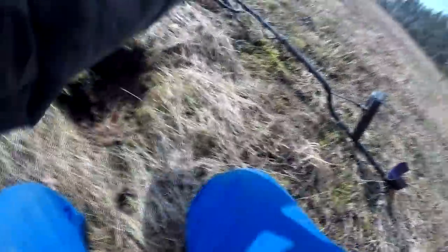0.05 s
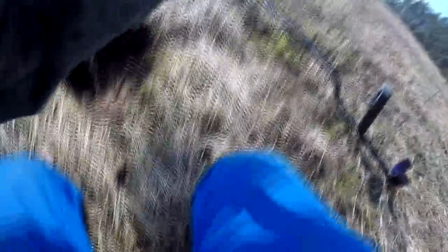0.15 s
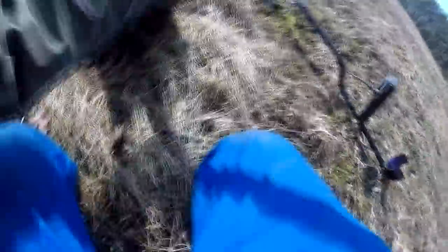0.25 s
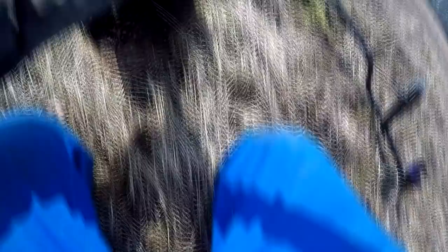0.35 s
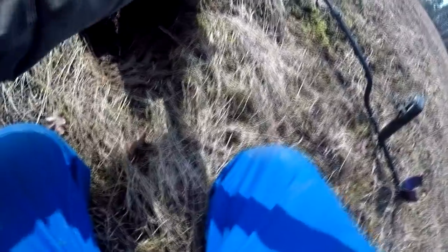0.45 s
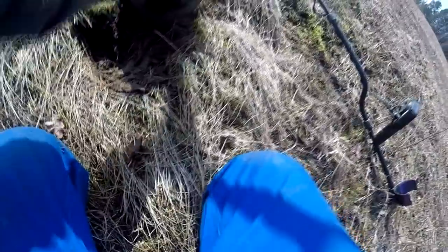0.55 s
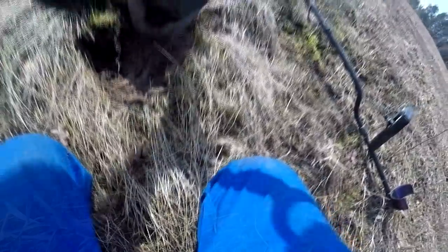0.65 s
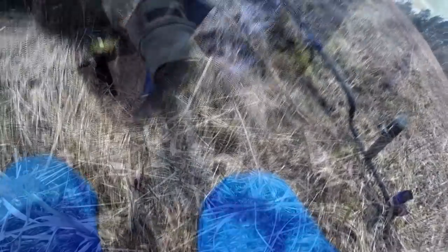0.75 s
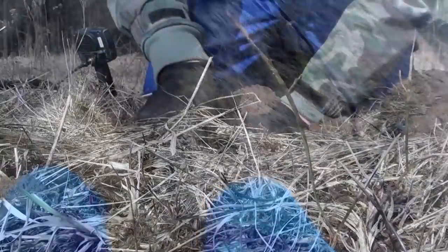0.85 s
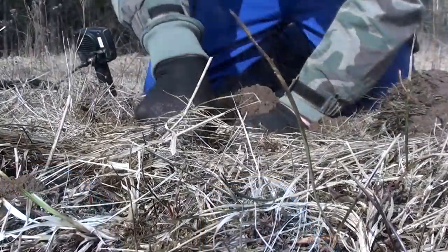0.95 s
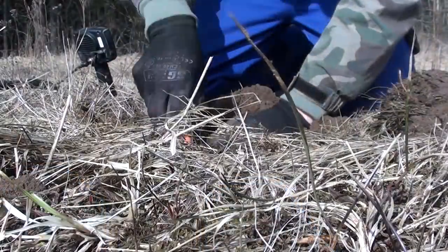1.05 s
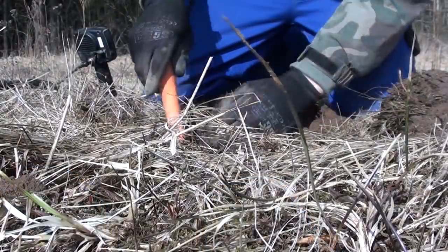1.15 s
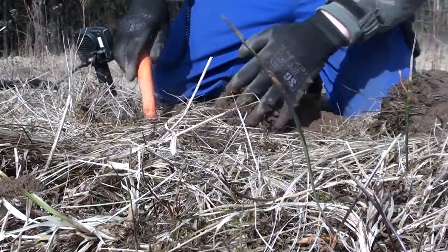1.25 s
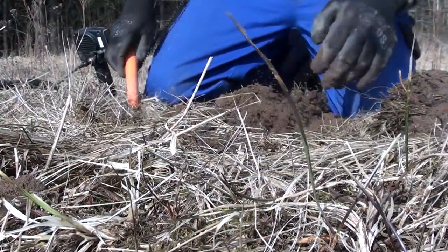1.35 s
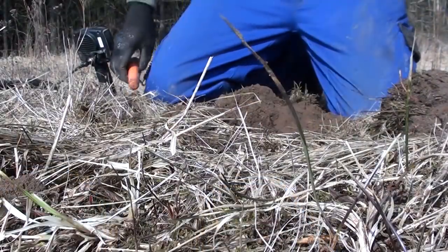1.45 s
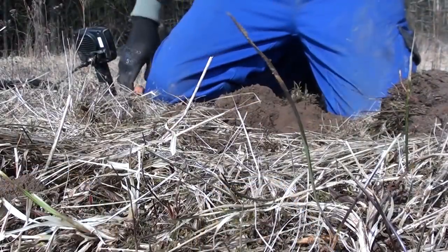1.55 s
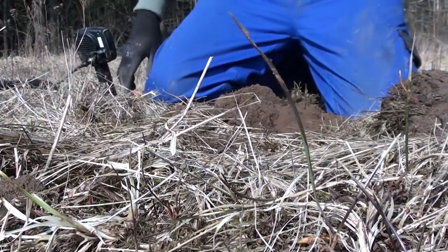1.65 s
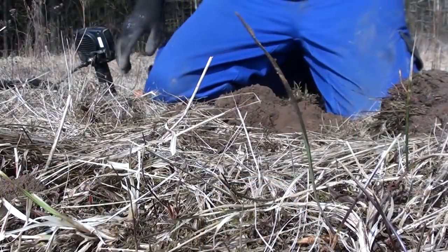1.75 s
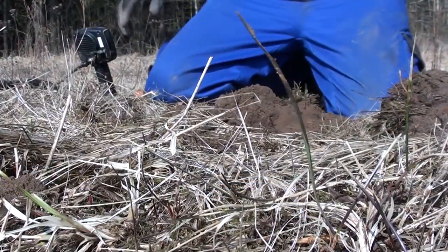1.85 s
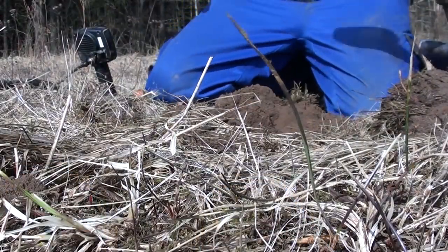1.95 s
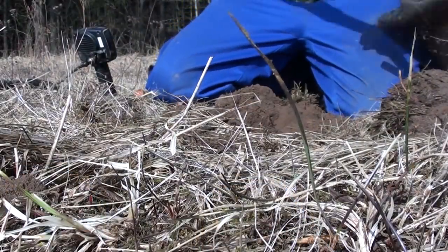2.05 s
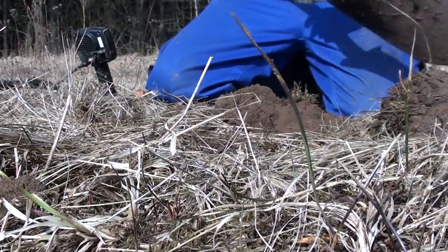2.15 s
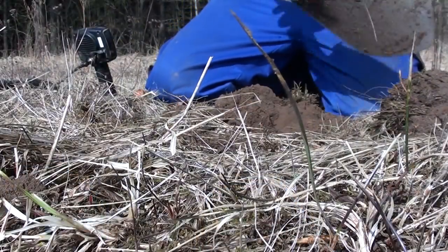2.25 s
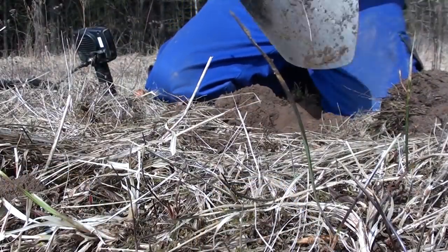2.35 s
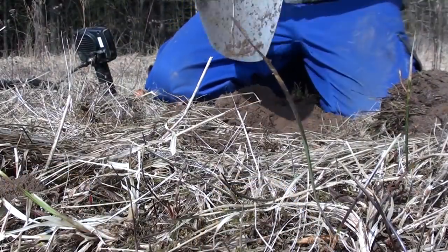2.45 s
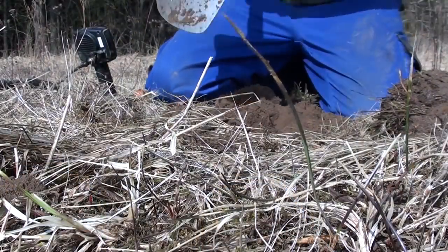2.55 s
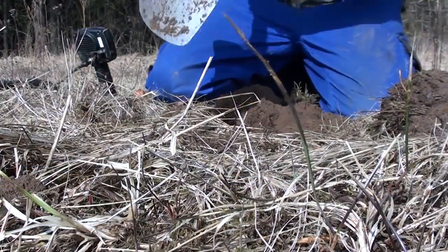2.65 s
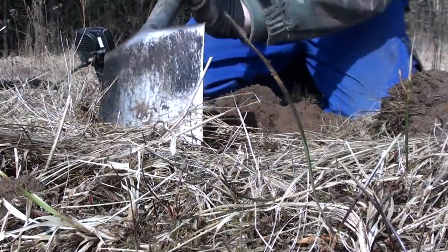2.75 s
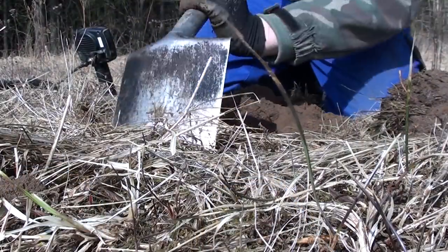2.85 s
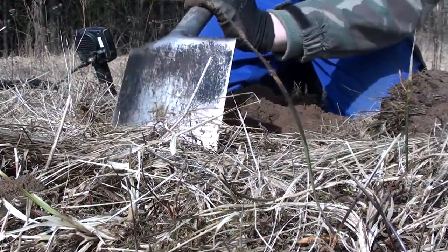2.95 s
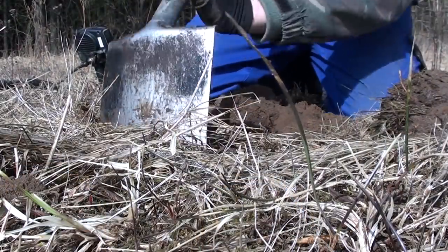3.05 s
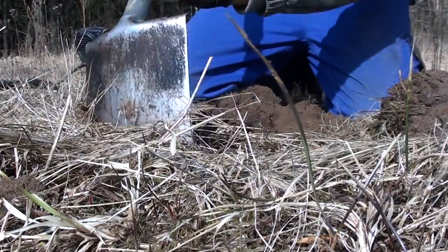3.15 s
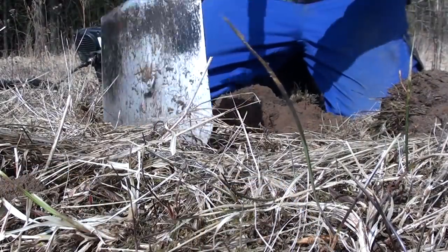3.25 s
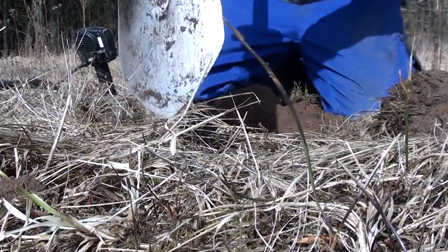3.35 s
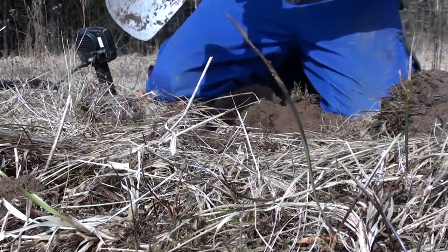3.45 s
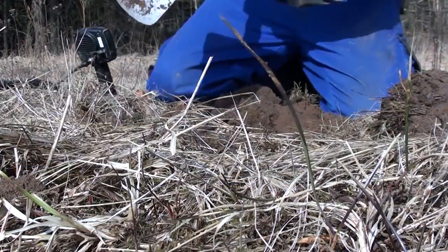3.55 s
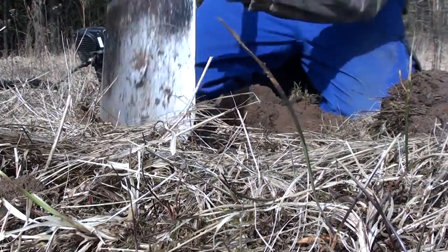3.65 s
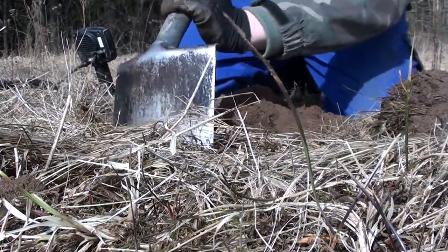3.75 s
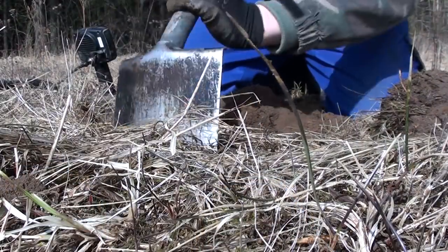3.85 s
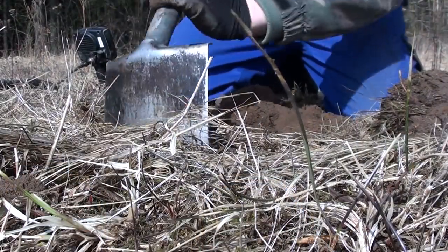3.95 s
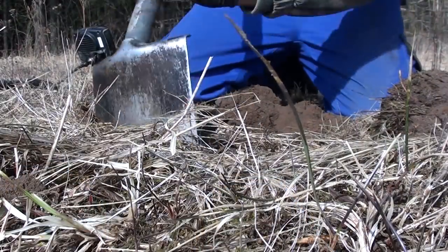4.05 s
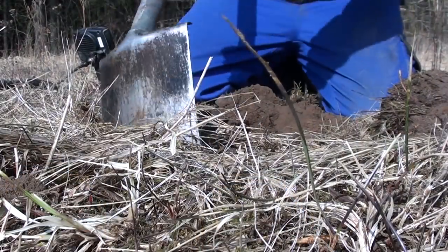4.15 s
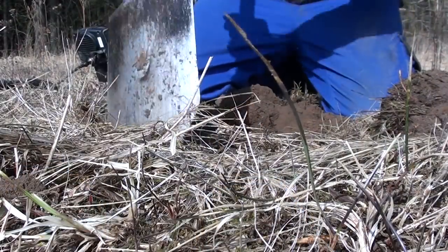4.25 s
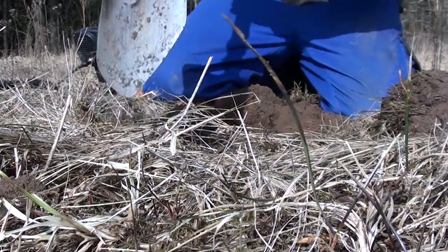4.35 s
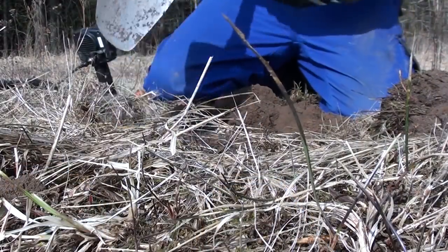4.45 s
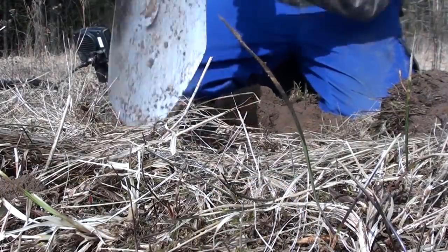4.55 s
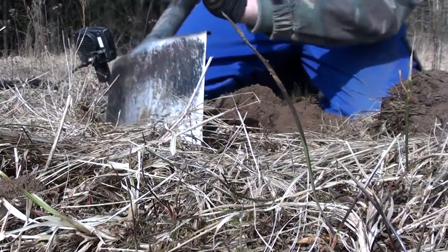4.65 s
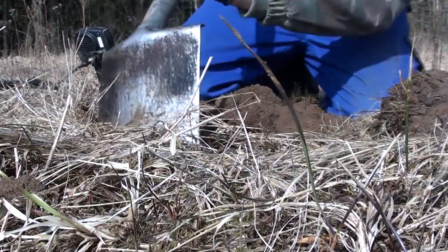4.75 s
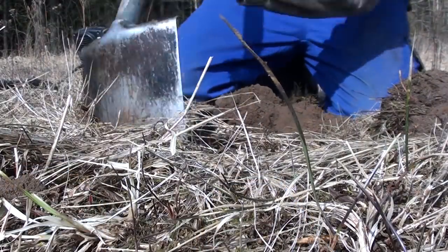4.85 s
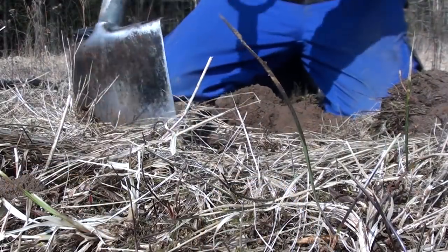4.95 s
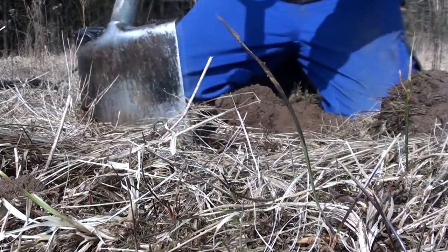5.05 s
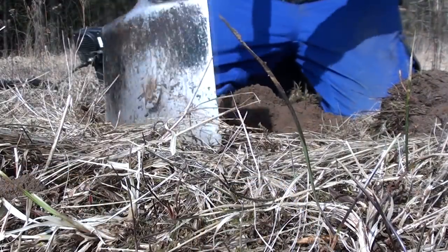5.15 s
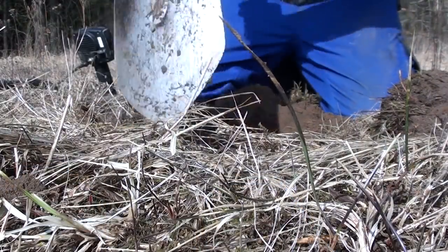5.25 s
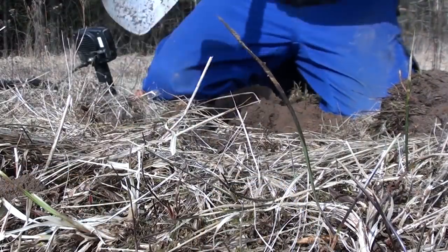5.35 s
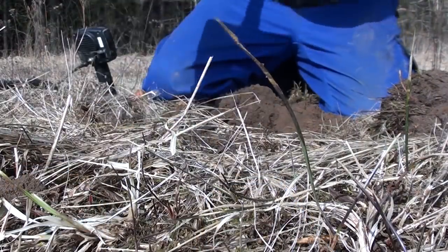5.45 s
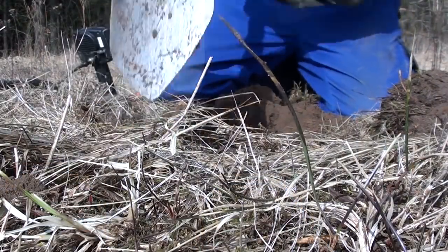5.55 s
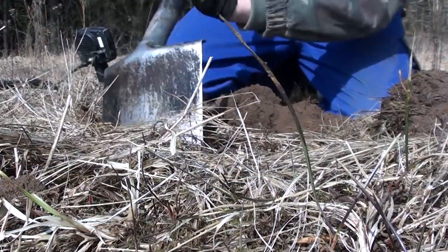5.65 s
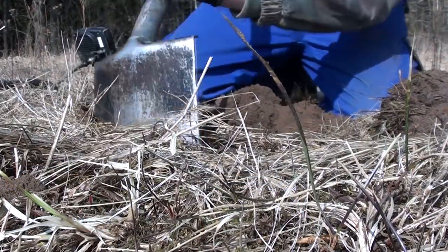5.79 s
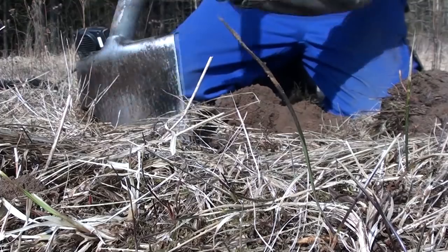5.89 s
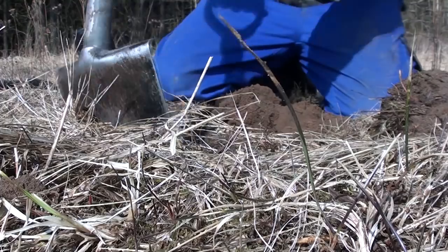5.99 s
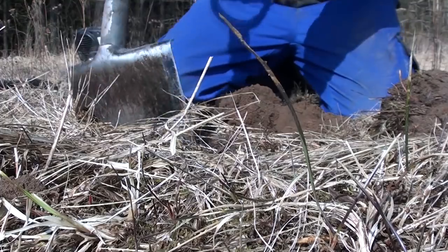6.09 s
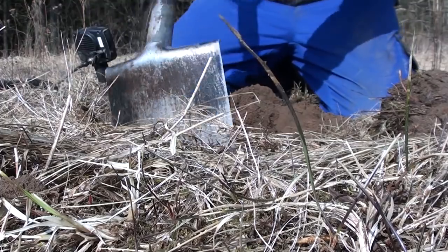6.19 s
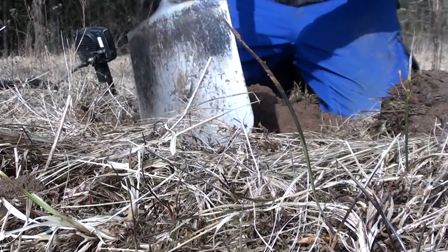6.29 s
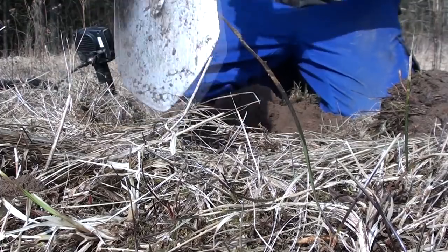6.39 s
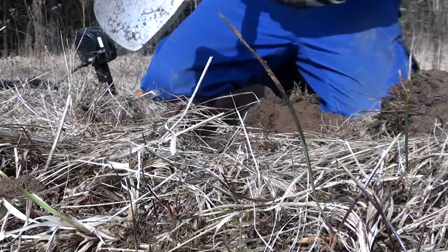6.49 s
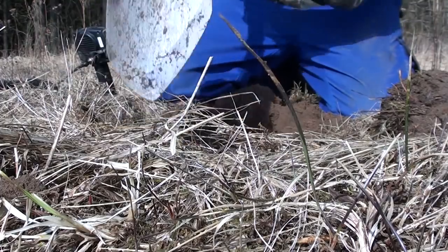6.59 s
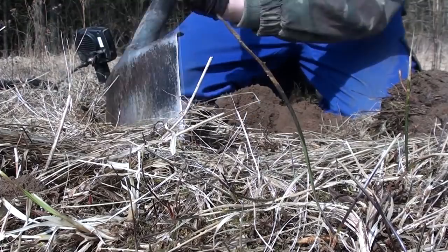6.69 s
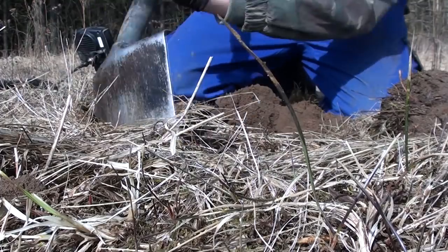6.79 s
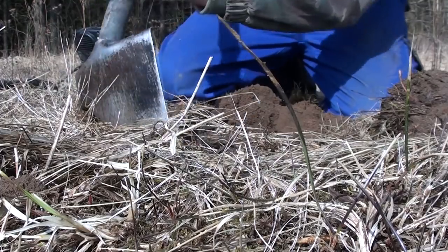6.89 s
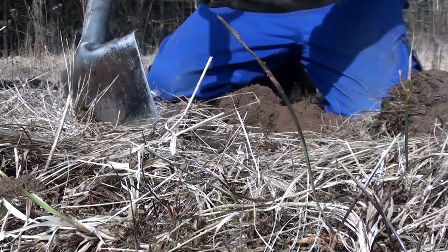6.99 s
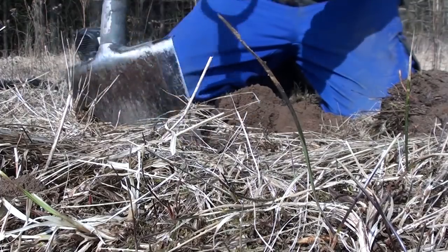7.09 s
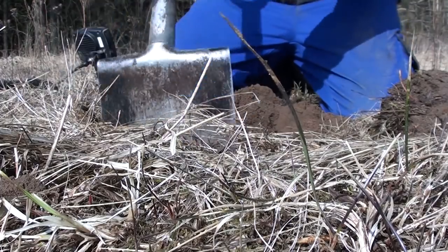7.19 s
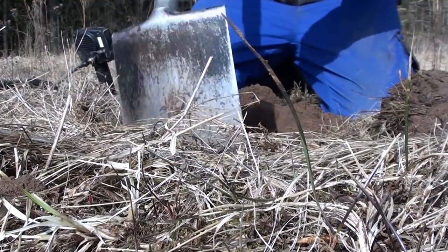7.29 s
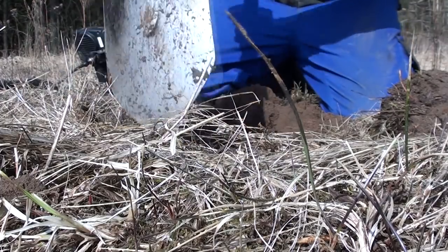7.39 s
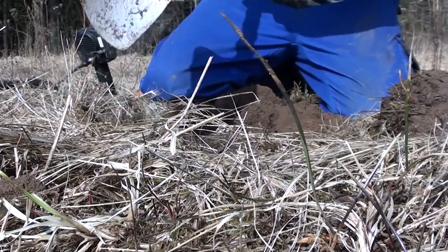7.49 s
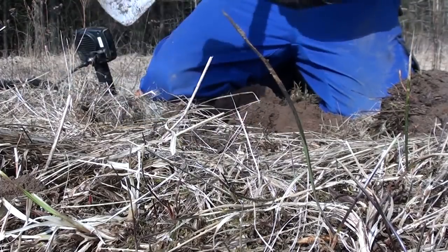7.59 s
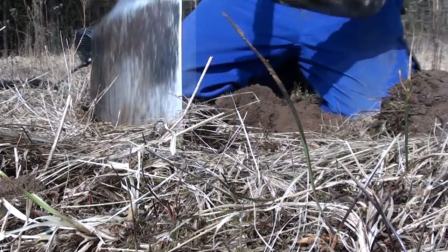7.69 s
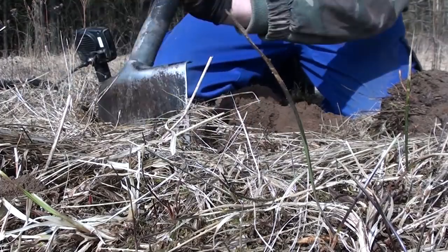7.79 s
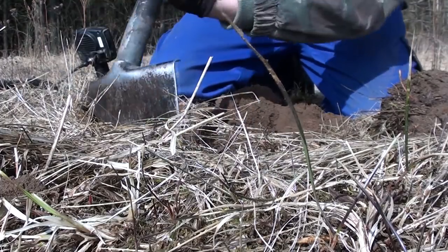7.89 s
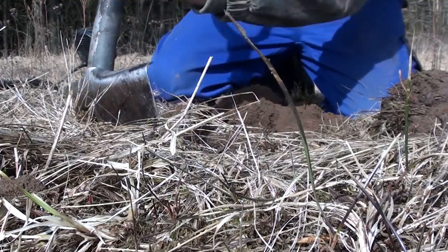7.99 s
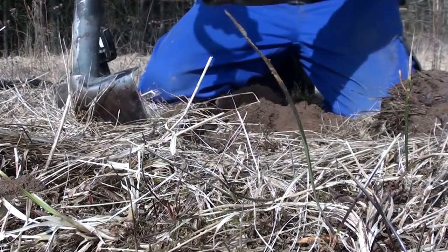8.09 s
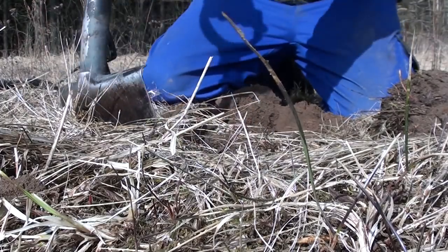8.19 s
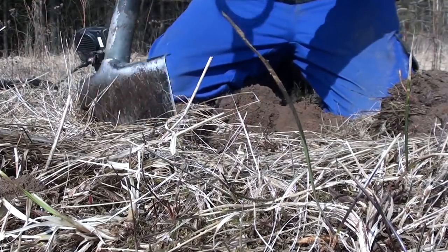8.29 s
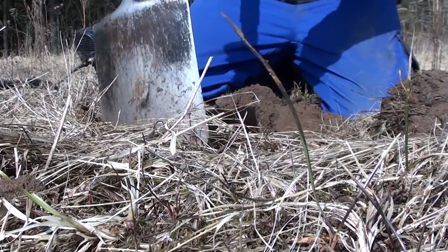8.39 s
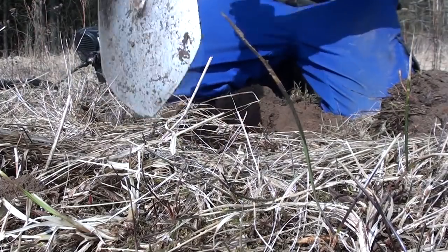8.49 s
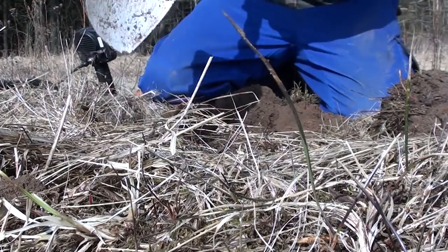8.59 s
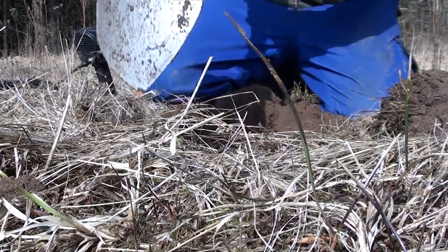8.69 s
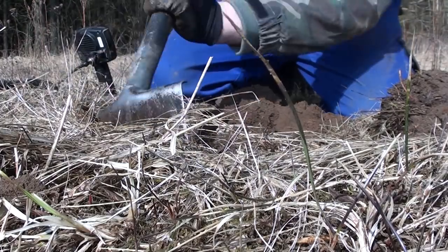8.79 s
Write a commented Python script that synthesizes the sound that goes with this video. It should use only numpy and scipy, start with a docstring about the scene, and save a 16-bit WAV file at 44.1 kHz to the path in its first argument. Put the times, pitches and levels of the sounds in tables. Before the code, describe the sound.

Brief handling rumble and bumps, then a steel spade chops six times into hard stony ground close by, grit crunching, blade clanking and scraping.

```python
"""A steel spade chops six times into hard stony ground, close by: grit bursts, the blade clanks, bends and thuds.
Between chops noise grains grate through soil and dry grass; decaying sines ring as the blade is pulled free.
For the first second a body-worn microphone adds rumble, rustle and bumps, then one lying in the grass takes over.
Open air: no room, a soft far rush, nearly mono up close; the highest peaks are clipped."""
import sys
import numpy as np
from scipy import signal
from scipy.fft import rfft, irfft, next_fast_len
from scipy.io import wavfile
from scipy.ndimage import uniform_filter1d, map_coordinates

SR = 44100
rng = np.random.default_rng(int(sys.argv[2]) if len(sys.argv) > 2 else 0)


def unload_audio(sound):
    """Save the sound as a 16-bit wav file, at the path given as the first command line argument."""
    columns = np.transpose(np.atleast_2d(sound))
    # keep every value between -1 and 1, then stretch to whole-number steps
    steps = np.round(np.clip(columns, -1, 1) * 32767)
    wavfile.write(sys.argv[1], SR, steps.astype(np.int16))


N = 389403

# The chops. Each row: impact in seconds, strength in dB, push in seconds, bending tone in Hz,
# its level in dB, its t60 in seconds, clank in dB, the pitch the clank favours in Hz.
CHOPS = [(2.8459, -1.5, 0.0067, 419, 2.5, 0.089, 3.5, 610), (3.7614, -1, 0.022, 714, 3, 0.086, 2.5, 1010),
         (4.6844, -1, 0.015, 432, -7, 0.15, -4, 696), (5.6913, 1.5, 0.0077, 484, 2.5, 0.18, 0.5, 1020),
         (6.7378, 0, 0.044, 428, -0.5, 0.084, -21, 1010), (7.7941, 2.5, 0.0068, 417, -3, 0.12, 5, 1450)]
# Resonances of the blade damped by soil. Each row: centre in Hz, width in Hz, level in dB.
BURIED_MODES = [(326.4, 66, -1.5), (470, 115, -1.5), (732, 161, -1.5), (1019, 82, -2.5), (1241, 64, -10),
                (1440, 170, -10.5), (2336, 390, -12), (4020, 36, -33), (5197, 53, -9.5), (7300, 70, -14)]
# Modes of the blade in air. Each row: pitch in Hz, level in dB, undamped t60 in seconds.
FREE_MODES = [(635, -14, .24), (786, -20, .5), (949, 0, .38), (1222, -9, .12), (1367, -10, .45),
              (1556, -22, .3), (1850, -20, .4), (2126, -14, .16), (2275, -11, .28), (2516, -12, .3),
              (2783, -13, .15), (3079, -16, .2), (3620, -14, .15), (4107, -14, .12), (4900, -18, .1),
              (5220, -12, .12), (7447, -14, .12), (8600, -18, .1), (9180, -18, .1), (10100, -18, .1)]
# Spectra of crushed grit and of dry grass. Each row: frequency in Hz, relative level in dB.
GRIT_SPECTRUM = [(710, -49), (1200, 3), (1400, -22), (1700, -7), (2620, -1), (4800, -6.5), (7410, 2),
                 (9510, -2), (16000, -15)]
GRASS_SPECTRUM = [(2470, -44), (4200, -8.5), (5910, -2.5), (6950, 2.5), (9140, -3.5), (10100, -3),
                  (15100, -19), (16000, 0.5)]


def amp(db):
    """dB to gain."""
    return 10 ** (np.asarray(db) / 20)


def unit(x):
    """x at rms 1."""
    return x / np.sqrt(np.mean(x ** 2) + 1e-20)


def along(points, hz):
    """Values at hz, joined between (Hz, value) points on a log frequency axis."""
    f, v = np.transpose(points)
    return np.interp(np.log(hz + 1), np.log(f + 1), v)


def curves(rows):
    """Gain per sample of a (seconds, dB) curve; -120 dB outside it."""
    s, db = np.transpose(rows)
    return amp(np.interp(np.arange(N) / SR, s, db, -120, -120))


def wobble(rate):
    """A random curve of straight segments, rate knots a second."""
    knots = rng.standard_normal(int(N * rate / SR) + 4)
    return map_coordinates(knots, [np.arange(N) * rate / SR], order=1)


def filtered(x, response):
    """x shaped by a (possibly complex) response of frequency."""
    m = next_fast_len(N + SR // 2)
    return irfft(rfft(x, m) * response(np.fft.rfftfreq(m, 1 / SR)), m)[..., :N]


def patchy(x, depth_db):
    """Noise whose level varies in small random patches of time and pitch, like crumbs of different sizes."""
    z = signal.stft(x, nperseg=256)[2]
    field = uniform_filter1d(rng.standard_normal(z.shape), size=3, axis=0)
    field = uniform_filter1d(field, size=4, axis=1)
    return unit(signal.istft(z * amp(depth_db * unit(field)), nperseg=256)[1][:N])


def grainy(spectrum, grain_db, lump_db, body=lambda hz: 1, shared_db=0):
    """Noise of rms 1 made of millisecond grains that come in lumps."""
    noise = patchy(rng.standard_normal(N), 3.16)
    grains = noise * amp(grain_db * wobble(700) + lump_db * wobble(45) + shared_db)
    return unit(filtered(grains, lambda hz: amp(along(spectrum, hz)) * body(hz)))


def bursts(rows):
    """Envelope of sudden pushes that hold, then decay: rows of (s, dB, hold s, t60 s)."""
    env, t = np.zeros(N + SR), np.arange(SR // 4) / SR
    for s, db, hold, t60 in rows:
        env[round(s * SR):][:len(t)] += amp(db - 60 * np.maximum(t - hold, 0) / max(t60, .003))
    return env[:N]


def ringing(rows, modes, spread_db, rise):
    """Each blow (s, dB, favoured Hz, fall dB per octave, share of t60) rings the modes at new strengths."""
    out, t = np.zeros(N + SR), np.arange(SR // 2) / SR
    hz, level, t60 = np.transpose(modes)[..., None]
    for s, db, favoured, fall_db, share in rows:
        mistuned_db = fall_db * np.abs(np.log2(hz / favoured))
        start = db + level - mistuned_db + rng.normal(0, spread_db, hz.shape)
        ring = amp(start - 60 * t / (share * t60)) * np.sin(2 * np.pi * hz * t)
        out[round(s * SR):][:len(t)] += ring.sum(0) * (1 - np.exp(-t / rise))
    return out[:N]


def swells(rows):
    """One gain per dB column: each row climbs 20 dB in its rise time, holds, and drops 20 dB in its fall time."""
    t, out = np.arange(N) / SR, 0
    for s, rise, hold, fall, *db in rows:
        before = (s - t) / max(rise, .003)
        after = (t - s - abs(hold)) / max(fall, .003)
        away = np.maximum(0, np.maximum(before, after))
        out = out + amp(db)[:, None] * amp(-20 * np.minimum(away, 10))
    return out


def resonances(hz, modes):
    """Causal response of (Hz, width Hz, dB) resonances, alternating in sign."""
    total = 0
    for k, (centre, width, db) in enumerate(modes):
        band = 1j * hz * width / (centre * centre - hz * hz + 1j * hz * width)
        total = total + (-1) ** k * amp(db) * band
    return total


def blade(hz):
    """Broad resonances of the blade while soil damps it."""
    return resonances(hz, BURIED_MODES)


def clanks(s, db, favoured, fall_db):
    """Sharp blows ring the buried blade; the broader a mode, the sooner it dies."""
    modes = [(hz, level, 3 / width) for hz, width, level in BURIED_MODES]
    return ringing(zip(s, db, favoured, 0 * s + fall_db, 0 * s + 1), modes, 5.4, 0.0017)


def chops():
    """Each blow clanks the blade, a push of crushed grit shakes it, it bends at its own pitch and the ground thuds."""
    grit_db, shake_db, thud_db = -12, 7, -30.5  # added to the strength
    bend_delay_s = 0.00892  # the blade starts to flex once the edge has stopped
    s, db, push, bend_hz, bend_db, bend_t60, clank_db, favoured = np.transpose(CHOPS)
    grit = bursts(zip(s, db + grit_db, push, 0 * s + 0.051)) * grainy(GRIT_SPECTRUM, 4.4, 0.42)
    force = bursts(zip(s, db + shake_db, push, 0 * s + 0.1)) * rng.standard_normal(N)
    bending = 0
    for at, level, hz, t60 in zip(s + bend_delay_s, bend_db, bend_hz, bend_t60):
        bending = bending + ringing([(at, level, hz, 0, 1)], [(hz, 0, t60)], 0, 0.0085)
    ground = [(70.2, -6, 0.29), (134.6, 8.5, 0.16), (213, 0, 0.12)]  # Hz, dB, t60 s
    thud = ringing([(at, level + thud_db, 100, 0, 1) for at, level in zip(s, db)], ground, 1.6, 0.015)
    return grit + filtered(force, blade) + clanks(s, clank_db, favoured, 11.3) + bending + thud


def cracks():
    """Stones and stalks crack at the edge: short bright snaps, each with a knock in the blade."""
    # Each row: start in seconds, crack in dB, knock in the blade in dB.
    snap_rows = [(1.385, -33.5, -25), (1.547, -22.5, -45), (1.617, -33.5, -45), (2.245, -32, -40),
                 (2.8813, -11, 4.5), (2.9281, -17, -12), (3.142, -24.5, -16), (3.17, -29, -28),
                 (3.2008, -26, -17), (3.285, -25.5, -18), (3.99, -32.5, -25), (4.214, -17, -3),
                 (4.2263, -15, -8), (4.846, -38, -26), (4.873, -27.5, -23), (4.9322, -30, -24),
                 (4.9509, -21.5, -12), (4.978, -27, -14), (5.164, -32, -17), (5.9304, -34, -11),
                 (5.977, -22.5, -7), (6.029, -33, -17), (6.139, -26.5, -19), (6.1782, -28, -20),
                 (6.298, -21, -25), (6.872, -36, -1), (6.9186, -12.5, 6), (6.953, -22.5, -7),
                 (7.152, -26, -5.5), (7.235, -22, -10), (7.289, -30, -13), (7.836, -22.5, -6),
                 (8.022, -24.5, -22), (8.079, -40, -17), (8.099, -24, -25), (8.115, -26, -19),
                 (8.182, -24, -15), (8.2302, -29.5, -35), (8.4358, -20.5, -26)]
    hold_s, snap_t60_s, knock_t60_s, clank_offset_db = 0.0032, .024, 0.021, -17.5
    s, db, knock_db = np.transpose(snap_rows)
    snap = bursts(zip(s, db, 0 * s + hold_s, 0 * s + snap_t60_s)) * grainy(GRIT_SPECTRUM, 3.5, 0)
    force = bursts(zip(s, knock_db, 0 * s + hold_s, 0 * s + knock_t60_s)) * rng.standard_normal(N)
    return snap + filtered(force, blade) + clanks(s, knock_db + clank_offset_db, 0 * s + 800, 2.2)


def movements():
    """Gains of grating, soil and grass: scrapes, swishes down into each chop, and faint stirring between."""
    # Scrapes of hands, then blade. Each row: start of the hold in seconds, rise, hold and fall in seconds,
    # blade grating in dB, soil in dB, dry grass in dB.
    scrapes = [ (1.12, 0.22, 0.33, 0.17, -43.5, -48.5, -42), (1.66, 0.37, 0.41, 0.25, -51, -50.5, -42.5),
               (2.255, 0.014, 0.0087, .05, -64, -38.5, -24.5), (2.42, 0.11, 0, 0.096, -64, -41.5, -26.5),
               (2.67, 0.22, 0.022, 0.17, -45, -52, -49), (2.89, 0.049, 0.036, 0.057, -25, -31.5, -33),
               (3.144, 0.088, 0.016, .25, -35.5, -34, -31), (3.292, 0.026, 0, 0.023, -35, -23.5, -21),
               (3.4, .15, 0, 0.039, -50, -69, -40), (3.83, 0.089, 0.0063, 0.12, -30, -36, -35.5),
               (4.012, 0.035, .14, 0.017, -37, -40, -34), (4.182, 0.063, 0.025, 0.062, -34, -34, -21.5),
               (4.27, 0.083, 0, 0.039, -50, -33, -25.5), (4.4, 0.092, .01, .03, -55, -60, -48),
               (4.75, 0.09, 0.022, .15, -42, -44, -50), (4.9, 0.062, 0.13, 0.061, -29, -34, -32.5),
               (5.16, 0.078, 0.006, 0.074, -35, -33, -33.5), (5.21, 0.057, .01, 0.024, -51, -37.5, -23),
               (5.8, 0.15, 0.011, 0.035, -52, -47.5, -53), (5.94, 0.02, 0.0076, 0.093, -29, -41, -41),
               (5.978, 0.013, 0.00067, 0.054, -25, -32, -30),
               (6.034, 0.086, 0.0087, .11, -22.5, -22.5, -25), (6.184, 0.049, 0, .12, -31, -28, -28.5),
               (6.33, 0.091, 0, 0.031, -34.5, -29.5, -28), (6.8, .03, 0, 0.037, -34, -46, -30),
               (6.876, 0.013, 0.0026, 0.02, -22, -19.5, -20.5),
               (6.922, 0.015, 0.0015, 0.035, -16, -19, -23), (7.012, 0.061, 0, .12, -33, -27.5, -36),
               (7.2, 0.18, 0.0063, 0.029, -22.5, -21.5, -20.5), (7.238, 0.014, 0, 0.024, -18.5, -22.5, -24),
               (7.3, 0.027, 0.031, 0.051, -28.5, -31.5, -27.5),
               (7.84, 0.024, 0.0013, 0.028, -18.5, -30.5, -36),
               (8.032, 0.099, 0.0042, 0.078, -28, -23.5, -29.5),
               (8.08, 0.027, 0.097, 0.037, -39, -29, -30.5), (8.117, 0.003, 0, 0.0039, -44, -11.5, -36),
               (8.278, 0.072, .13, 0.067, -45, -34, -33.5), (8.44, 0.012, 0.013, 0.012, -40, -35, -20.5)]
    # One swish through the grass: rise, hold and fall in seconds, grating, soil and grass in dB.
    swish = (0.13, 0.0115, 0.64, -47.5, -50.5, -35.5)
    # Stirring: start in seconds, grating, soil and grass in dB.
    stirring = (2, -58, -79.5, -71)
    last_swish_s = 8.83  # no chop follows it
    ends = [row[0] for row in CHOPS] + [last_swish_s]
    swishes = [(s - swish[1], *swish) for s in ends]  # the hold ends at the impact
    start, *stir_db = stirring
    return swells([*scrapes, *swishes, (start, .2, N / SR, 1, *stir_db)])


def pings(strength, rate, share):
    """Sparse hard grains, rate a second per mode, each ringing one mode of the half-damped steel."""
    out = np.zeros(N)
    for hz, db, t60 in FREE_MODES:
        grains = strength * amp(.5 * db) * rng.standard_normal(N) * (rng.random(N) < rate / SR)
        damped_t60 = share * np.sqrt(.1 * t60)  # drawn towards 0.1 s before the share
        fade = amp(-60 / (damped_t60 * SR))
        turn = 2 * np.pi * hz / SR
        out += signal.lfilter([np.sin(turn)], [1, -2 * fade * np.cos(turn), fade ** 2], grains)
    return out


def crumbs(soil):
    """Small stones snap at random under a firm scrape, few of them large."""
    per_s, level_db, spread_db, t60_s = 110, 1.5, 3, 0.0065
    when, size = rng.random((2, N))
    hits = (when < per_s / SR) * amp(level_db - spread_db * np.log(1 - size))
    firm = np.maximum(soil - amp(-42), 0)
    decaying = signal.lfilter([1], [1, -amp(-60 / (t60_s * SR))], hits)
    return firm * decaying * grainy(GRIT_SPECTRUM, 4, 0)


def drags():
    """Grains of soil rub the blade's resonances; crumbs and dry stalks hiss above; the edge catches in jerks."""
    # Spectra of grating and of soil. Each row: frequency in Hz, relative level in dB.
    grating_spectrum = [(25, -35), (88, -7), (150, -12), (510, 6), (601, 5), (947, 6), (1160, -4.5),
                        (1400, -5), (2000, -35), (2600, -65), (4400, -120)]
    soil_spectrum = [(880, -10.5), (1500, 4), (1900, -5.5), (2240, -0.5), (3430, -3), (5200, -10),
                     (6760, -13), (11400, -120)]
    grating, soil, grass = movements()
    # a light touch is smooth, a firm one jerky
    firm = np.clip(grating / amp(-37.5), .15, 1)
    jerks_db = 2.3 * firm * wobble(90)

    def rubbed(hz):
        """The blade's resonances over a plain floor, weak below 90 Hz."""
        return (0.35 + np.abs(blade(hz))) * hz ** 2 / (hz ** 2 + 90 ** 2)

    # only a firm rub reaches the steel
    steel = amp(4) * pings(np.maximum(soil - amp(-46), 0), 25, .4)
    grate = grating * grainy(grating_spectrum, 0.98, 1.8 * firm, rubbed, jerks_db)
    earth = soil * grainy(soil_spectrum, 3.2, 1.7, rubbed, jerks_db)
    stalks = grass * grainy(GRASS_SPECTRUM, 0.47, 0.92, rubbed, jerks_db)
    return grate + earth + stalks + steel + crumbs(soil)


def steel_rings():
    """The free blade rings broadly when released from the soil, on one mode when a stone pings it."""
    # Releases. Each row: start in seconds, level in dB, favoured pitch in Hz,
    # fall in dB per octave away from it, share of the undamped t60.
    releases = [(3.288, -19.5, 1100, 6, 0.97), (4.265, -13, 2550, 20, 0.25), (4.29, -16, 5220, 12, .64),
                (5.168, -23, 5220, 11, .4), (5.212, -29.5, 949, 2.5, 0.84), (5.212, -9.5, 7500, 12, 0.74),
                (6.325, -16.5, 2140, 20, 0.48), (7.3, -17.5, 2783, 10, 0.82), (7.335, -23, 1390, 10, .35),
                (8.438, -2, 3770, 14, 0.31)]
    # Stones against the blade. Each row: start in seconds, level in dB, favoured pitch in Hz.
    stones = [(2.995, -33, 2516), (4.245, -10, 7447), (5.705, -4, 4107), (5.793, -19, 4900),
              (6.345, -23, 1850), (6.8, -16, 4107), (6.925, -5.5, 4107), (7.3, -17, 8600),
              (7.325, -21, 10100), (7.805, -13, 4107), (8.405, -16, 5220)]
    fall_db, share = 87, 0.94  # so steep a fall leaves one mode
    rows = [*releases, *[(s, db, hz, fall_db, share) for s, db, hz in stones]]
    return ringing(rows, FREE_MODES, 0.44, 0.00086)


def small_sounds():
    """A small steel part ticks thinly, and clods drop as soft, quickly dying pairs of low tones."""
    # Ticks. Each row: start in seconds, level in dB, favoured pitch in Hz.
    tick_rows = [(3.4094, -58, 12800), (3.6825, -31, 6740), (3.932, -31.5, 6800), (4.338, -30.5, 6800),
                 (4.4629, -26, 7140), (4.625, -27, 9600), (4.6397, -33.5, 12700), (6.2168, -30.5, 12700),
                 (6.2701, -30, 12700), (7.2374, -26.5, 12700), (7.572, -37, 6870), (7.638, -36, 13100),
                 (7.693, -31, 12400), (8.332, -18.5, 6850), (8.549, -26.5, 6830), (8.725, -38, 9540)]
    # Clods. Each row: start in seconds, level in dB, lower pitch in Hz.
    clod_rows = [(1.333, -29.5, 332), (3.577, -23.5, 305), (7.909, -19, 149)]
    # Modes of the small part. Each row: pitch in Hz, level in dB, t60 in seconds.
    part_modes = [(6837, -2, .08), (8500, -12, .04), (9534, -7, .2), (12750, 0, .12)]
    fall_db, click_db = 15, -2.5  # per octave from the favoured pitch; click over the tick
    ticks = ringing([(s, db, hz, fall_db, 1) for s, db, hz in tick_rows], part_modes, 1, 0.00039)
    ticks += bursts([(s, db + click_db, .002, .015) for s, db, _ in tick_rows]) * grainy(GRASS_SPECTRUM, 2.7, 0)
    clods = 0
    for s, db, hz in clod_rows:
        clods = clods + ringing([(s, db, hz, 0, 1)], [(hz, 0, .07), (1.42 * hz, -4, .05)], 0.64, 0.002)
    return ticks + clods


def ports(x):
    """Scattered paths reach the two ports of the microphone in the grass a little differently."""
    # Each row: frequency in Hz, side level against mid in dB.
    near_side = [(60, -22), (150, -22.5), (380, -65), (950, -30), (2380, -50), (5980, -20.5), (15000, -42)]
    scatter_t60_s = 0.0017
    t = np.arange(SR // 20) / SR
    scatter = rng.standard_normal(len(t)) * amp(-60 * t / scatter_t60_s)
    side = signal.fftconvolve(x, scatter / np.linalg.norm(scatter))[:N]
    side = filtered(side, lambda hz: amp(along(near_side, hz)))
    return np.array([x + side, x - side])


def body_microphone():
    """Lumpy rumble through the housing, cloth and grass brushing it, and single bumps."""
    # Housing rumble over time. Each row: time in seconds, level in dB.
    rumble_curve = [(0.0, -32), (0.112, -23.5), (0.216, -28.5), (0.248, -18), (0.29, -9), (0.336, -30),
                    (0.394, -13), (0.41, -22), (0.54, -29), (0.886, -30.5), (1.15, -58)]
    # Bumps. Each row: start in seconds, click in dB, knock in dB, thump in dB.
    bumps = [(0.0867, -65, -36.5, -30), (0.2498, -17.5, -13, -11), (0.26, -34, -29, -8.5),
             (0.2746, -19.5, -30, -12), (0.337, -64, -29.5, -13), (0.3849, -45, -26.5, -9),
             (0.47, -51, -50, -12), (0.587, -23, -32, -25), (0.613, -25.5, -24.5, -27),
             (0.64, -28.5, -37, -29), (0.6881, -56, -45, -21), (0.7615, -33, -34, -16),
             (0.814, -23.5, -26, -28), (0.83, -30, -30, -44)]
    # Brushes. Each row: start of the hold in seconds, rise, hold and fall in seconds, cloth in dB, grass in dB.
    brushes = [(.03, 0.16, 0.39, 0.12, -46, -53.5), (.25, 0.011, 0, 0.037, -25, -27),
               (.338, 0.026, 0, 0.034, -50, -50), (.618, 0.12, 0.0038, 0.09, -32, -32.5),
               (.822, 0.08, 0, .08, -33, -31.5)]
    # Spectra of rumble, cloth and rustling grass. Each row: frequency in Hz, relative level in dB.
    rumble_spectrum = [(12, -35), (20, 3), (47, -3), (130, -5.5), (325, -21.5), (398, -26.5), (500, -30.5),
                       (650, -34), (1100, -120)]
    cloth_spectrum = [(180, -20), (300, -0.5), (489, -2.5), (796, -14), (980, -3), (2600, -13), (3380, -53),
                      (5720, -120)]
    rustle_spectrum = [(1180, -29), (2000, -9), (3840, 0.5), (4300, -3.5), (7240, -2.5), (14000, -34)]
    bump_t60_s = 0.033
    cloth, grass = swells(brushes)
    clicks = bursts([(s, db, .002, bump_t60_s) for s, db, _, _ in bumps]) * grainy(rustle_spectrum, 2.6, 0)
    knocks = bursts([(s, db, .003, bump_t60_s) for s, _, db, _ in bumps]) * grainy(cloth_spectrum, 0.66, 0)
    housing = [(31.6, 0.5, 0.086), (62.5, -2, .06), (142, 0, 0.039)]  # Hz, dB, t60 s
    thumps = ringing([(s, db, 80, 0, 1) for s, _, _, db in bumps], housing, 4.0, 0.0036)
    rustle = cloth * grainy(cloth_spectrum, 1.4, 2.8) + grass * grainy(rustle_spectrum, 0.98, 1.8)
    return curves(rumble_curve) * grainy(rumble_spectrum, 0, 2.0) + rustle + clicks + knocks + thumps


def worn_ports():
    """The housing shakes each port of the body-worn microphone in its own way: a second draw makes the side."""
    # Each row: frequency in Hz, gain of the side in dB.
    worn_side = [(60, -14), (120, -4.5), (240, -9.5), (480, 1), (950, 3.5), (1890, 1.5), (3770, -9),
                 (7520, 1.5), (15000, 5)]
    worn = body_microphone()
    unlike = filtered(body_microphone(), lambda hz: amp(along(worn_side, hz)))
    return np.array([worn + unlike, worn - unlike])


def far_rush():
    """Distant air and traffic as slowly wavering noise, wider than the near sounds; it rises towards 0.93 s."""
    # Spectrum of the distance. Each row: frequency in Hz, relative level in dB.
    far_spectrum = [(12, -68), (20, -58), (43, -13), (163, -6), (328, -1.5), (367, -4), (446, -4.5),
                    (499, -3.5), (849, -7.5), (1060, -12.5), (1220, -11), (2600, -16), (3340, -17.5),
                    (6720, -15), (16000, -25)]
    # Width of the distance. Each row: frequency in Hz, side level against mid in dB.
    far_side = [(60, -20), (180, -14), (550, -8), (1650, -1.5), (4970, -10.5), (15000, -30)]
    mid_db = -46
    noise = rng.standard_normal((2, N)) * amp(0.9 * wobble(6))
    mid, side = filtered(noise, lambda hz: amp(along(far_spectrum, hz) + [0 * hz, along(far_side, hz)]))
    fade = np.clip((np.arange(N) / SR - .72) / 0.21, .2, 1)
    return amp(mid_db) * fade * np.array([mid + side, mid - side]) / np.std(mid)


def scene():
    """The spade near the microphone in the grass, the body-worn microphone and the far rush."""
    near = drags() + chops() + cracks() + steel_rings() + small_sounds()
    return worn_ports() + ports(near) + far_rush()


def record(dry):
    """The input stage clips just below full scale and nothing above the band limit is kept."""
    top_hz = 15800
    clipped = dry / (1 + np.abs(dry / .96) ** 20) ** (1 / 20)
    return filtered(clipped, lambda hz: hz < top_hz)


dry = scene()
out = record(dry)
unload_audio(out)
```